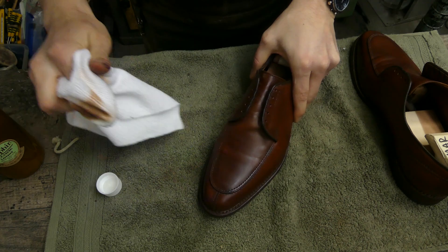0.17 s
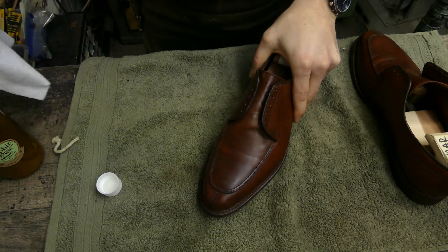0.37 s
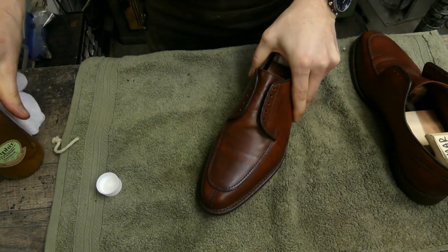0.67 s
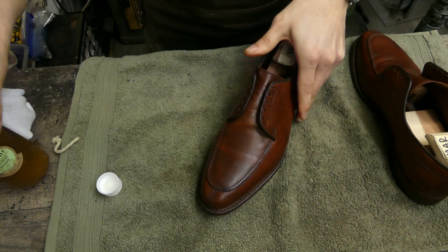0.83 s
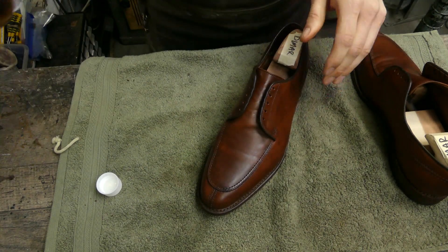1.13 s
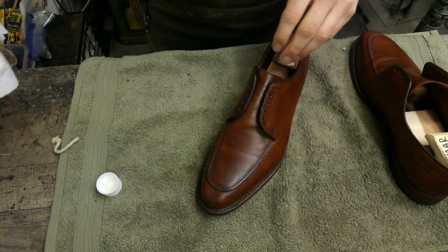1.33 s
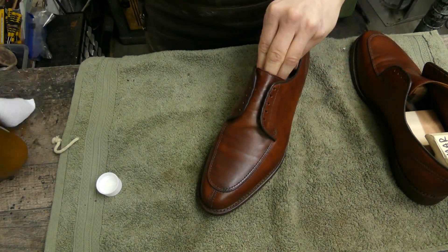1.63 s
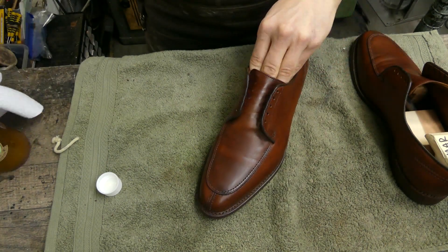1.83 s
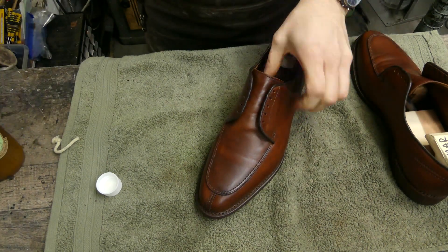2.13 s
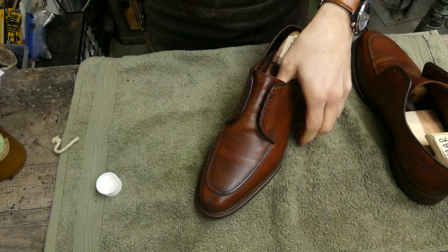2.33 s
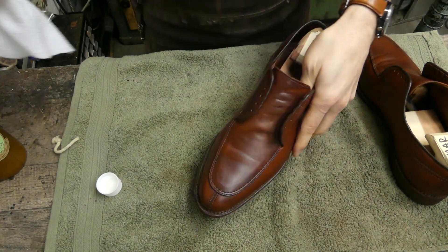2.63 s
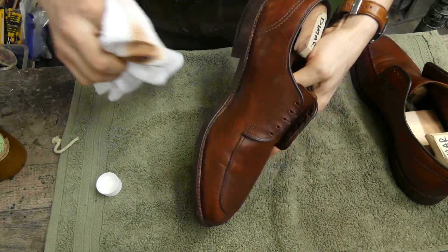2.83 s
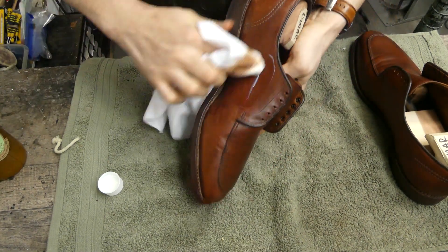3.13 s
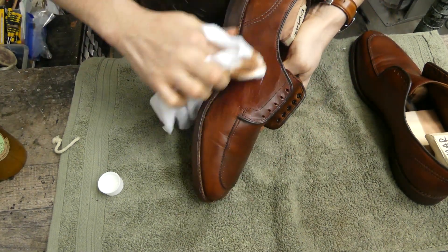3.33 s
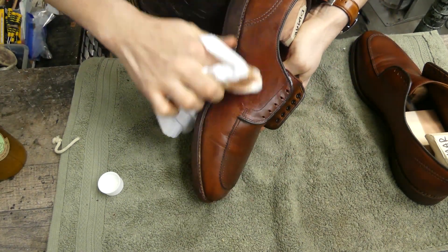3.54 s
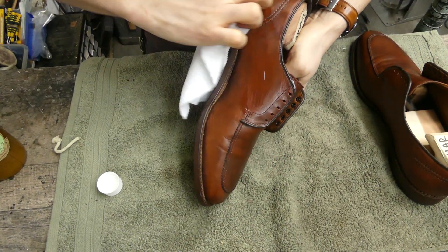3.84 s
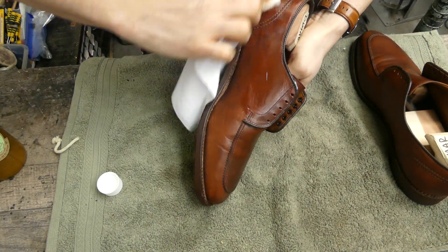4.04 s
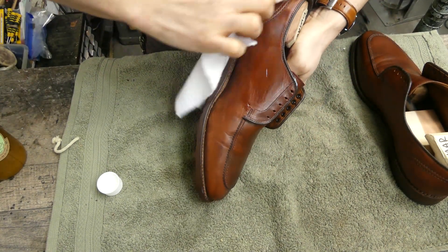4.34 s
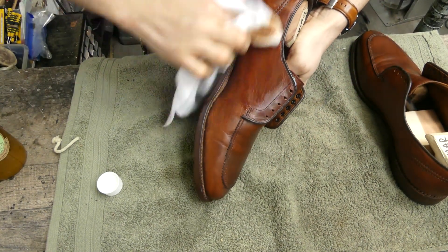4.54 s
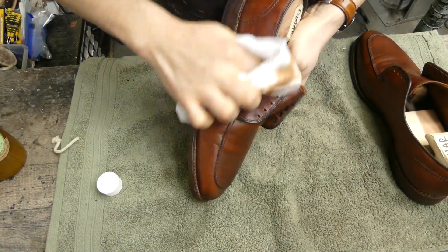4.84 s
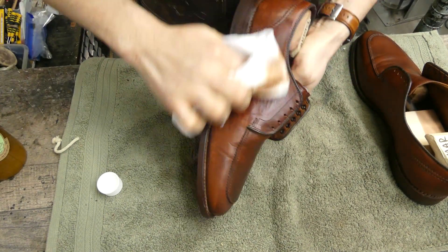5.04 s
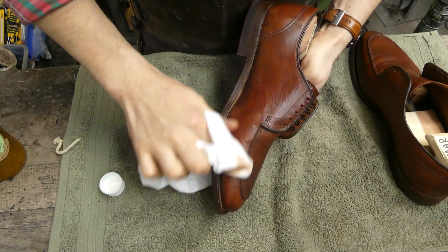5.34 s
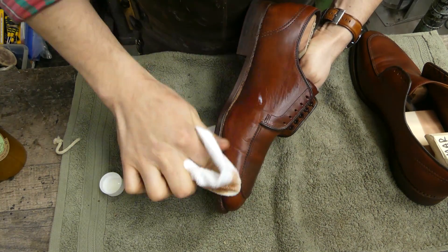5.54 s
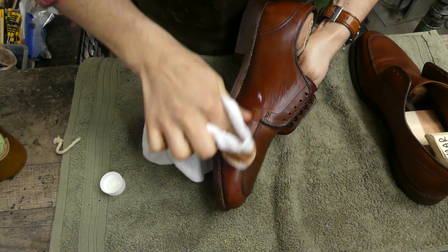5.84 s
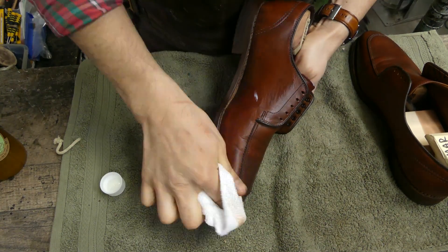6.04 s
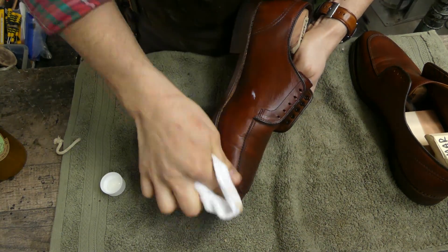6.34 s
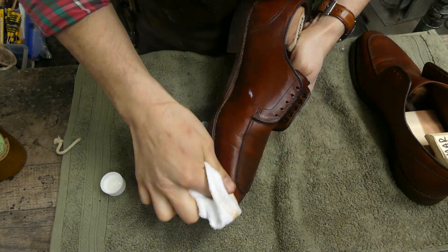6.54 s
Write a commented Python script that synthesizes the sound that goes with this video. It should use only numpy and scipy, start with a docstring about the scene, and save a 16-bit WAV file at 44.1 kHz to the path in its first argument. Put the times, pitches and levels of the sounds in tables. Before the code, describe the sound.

In a quiet workshop, a shoe is set down with booming wooden thuds, then brisk scratchy cloth rubbing with little clicks and squeaks.

```python
"""Cloth rustle, room tone, low wobble and small taps open; a shoe is cleaned in a quiet workshop.
Bottle and shoe are handled on a towel-covered wooden bench, then cloth strokes rub the leather:
shaped noise follows stroke speed, catches ring the leather, squeals are narrow sagging noise.
Blows ring damped bench modes and overload the recorder; its stand sways near 30 Hz.
Short ringing sines make taps and buckle jingles; feedback delays make the room."""
import sys
import numpy as np
from scipy import signal
from scipy.io import wavfile

SR = 44100
rng = np.random.default_rng(int(sys.argv[2]) if len(sys.argv) > 2 else 0)


def master_out(mix):
    """Clip the mix to full scale and print it as 16-bit PCM to the path in sys.argv[1]."""
    frames = np.transpose(np.atleast_2d(mix))
    ceiling = np.clip(frames, -1, 1)
    pcm = np.round(ceiling * 32767).astype(np.int16)
    wavfile.write(sys.argv[1], SR, pcm)


N = 295029


def amp(db):
    """Decibels to linear amplitude."""
    return 10 ** (np.asarray(db) / 20)


def rms_one(x):
    """Scale to rms 1."""
    return x / np.sqrt(np.mean(x ** 2) + 1e-20)


def at_hz(points, hz):
    """Interpolate a table over log frequency."""
    table_hz, values = np.array(points).T
    return np.interp(np.log(hz), np.log(table_hz), values)


def drift(rate_hz):
    """Slow random signal of spread 1: noise through a double one-pole low-pass, at SR / 40."""
    r = np.exp(-80 * np.pi * rate_hz / SR)
    noise = rng.standard_normal(N // 40 + 2002)
    slow = signal.lfilter([1], [1, -2 * r, r * r], noise)[2000:]
    return np.interp(np.arange(N) / 40, np.arange(len(slow)), rms_one(slow))


def soften(x, hz):
    """Padded contact: double one-pole low-pass."""
    r = np.exp(-2 * np.pi * hz / SR)
    return signal.lfilter([(1 - r) ** 2], [1, -2 * r, r * r], x)


def ring(clicks, hz, t60_s):
    """Two-pole resonator: a unit click starts a decaying sine of height 1."""
    r, w = amp(-60 / (t60_s * SR)), 2 * np.pi * hz / SR
    return signal.lfilter([0, np.sin(w)], [1, -2 * r * np.cos(w), r * r], clicks + 1e-18)


def grit(per_s, spread_db):
    """Dense fibre slips: random clicks of uneven size on fine noise, two unrelated draws."""
    size_db = spread_db * np.minimum(rng.exponential(1, (2, N)), 4)
    clicks = amp(size_db) * (rng.random((2, N)) < per_s / SR)
    return rms_one(rng.standard_normal((2, N)) * (1 + clicks))


def stereo(pair, alike):
    """Left and right share the first draw and differ by the second."""
    alike = np.clip(alike, 0, 1)
    return np.sqrt(1 + alike) * pair[0] + np.sqrt(1 - alike) * pair[1] * [[1], [-1]]


def banded(sources, spectrum, likeness, patchy_db, low_hz):
    """Half-octave noise bands, each with its level, flicker and likeness; rms 1."""
    out, edges_hz = 0, low_hz * 2 ** np.arange(0, np.log2(18000 / low_hz), 0.5)
    for k, (low, high) in enumerate(zip(edges_hz, edges_hz[1:])):
        band = signal.butter(2, [low, high], "band", fs=SR, output="sos")
        pair = signal.sosfilt(band, sources[k % 2])
        hz = np.sqrt(low * high)
        level = amp(at_hz(spectrum, hz) + patchy_db * drift(14.5))
        out = out + level * stereo(pair, at_hz(likeness, hz))
    return rms_one(out)


def resonant(pair, peaks, likeness, patchy_db):
    """Parallel resonances with alternating sign, each swelling on its own; rms 1."""
    out = 0
    for k, (hz, width_hz, level_db) in enumerate(peaks):
        r = np.exp(-np.pi * width_hz / SR)
        poles = [1, -2 * r * np.cos(2 * np.pi * hz / SR), r * r]
        band = signal.lfilter([1 - r * r, 0, r * r - 1], poles, pair)
        level = (-1) ** k * amp(level_db + patchy_db * drift(17.0))
        out = out + level * stereo(band, at_hz(likeness, hz))
    return rms_one(out)


# room tone and microphone hiss: (frequency [Hz], relative level [dB])
AIR_SPECTRUM = [(26, -42), (45, 17), (85, -31), (191, -33), (233, 9.5), (263, -19.5), (336, 4.5),
                (371, -19), (409, 0), (486, -32.5), (719, -3.5), (942, -20), (4640, -23.5), (12700, -20),
                (15800, -13.5)]
# left-right likeness of the air: (frequency [Hz], likeness [0-1])
AIR_LIKENESS = [(60, 0.85), (180, 0.97), (550, 0.61), (1650, 0.14), (4970, 0.29), (15000, 0.88)]
AIR_DB = -46


def room_air():
    """Steady room tone and hiss: noise in flickering bands."""
    noise = rng.standard_normal((2, 2, N))
    return amp(AIR_DB) * banded(noise, AIR_SPECTRUM, AIR_LIKENESS, patchy_db=0.5, low_hz=45.65)


# cloth, bottle and shoe moved about:
# (time loudest [s], swell time [s], fibre hiss [dB], drag [dB], hollow [dB])
RUSTLES = [(0.0, .01, -38, -45.5, -39), (0.671, 0.22, -64, -42.5, -45.5), (0.793, .03, -36.5, -38, -34.5),
           (0.86, 0.034, -75, -55, -56), (1.19, 0.33, -61, -61, -53.5), (1.66, 0.15, -49, -60, -48.5),
           (1.778, 0.029, -43, -43.5, -39.5), (1.86, 0.11, -61, -50, -52), (1.998, 0.033, -53, -49, -40.5),
           (2.1, 0.13, -50, -55, -48.5), (2.36, 0.36, -59, -51.5, -71), (2.6, 0.25, -58, -49.5, -49.5),
           (2.76, 0.24, -51, -61, -50), (2.93, 0.16, -48.5, -59, -50)]
SWELL_DB, RUSTLE_FADE_DB_S = 17.5, 130.5   # rise over one swell time; fade rate


def rustle_levels():
    """Hiss, drag and hollow levels of the handling: exponential swell and fade."""
    t, levels = np.arange(N) / SR, np.zeros((3, N))
    for s, swell_s, *level_db in RUSTLES:
        shape_db = np.where(t < s, SWELL_DB * (t - s) / swell_s, RUSTLE_FADE_DB_S * (s - t))
        levels += np.outer(amp(level_db), amp(shape_db))
    return levels


# fibre hiss: (frequency [Hz], relative level [dB per Hz])
FIBRES = [(2100, -3), (2700, 0.5), (3500, -2), (4800, 0.5), (5800, 0.5), (6900, 3.5), (8500, 2),
          (10500, -5), (13000, -7), (16000, -7)]
# leather panels: (frequency [Hz], width [Hz], relative level [dB])
LEATHER_PANELS = [(1566, 1800, 11), (2020, 590, 14.5), (2460, 1060, -4)]
# air and shell of the shoe: (frequency [Hz], width [Hz], relative level [dB])
SHOE_HOLLOW = [(344, 103, 6.5), (730, 168, 1), (987, 34, 4), (1235, 79, 1)]
# left-right likeness of the rubbing: (frequency [Hz], likeness [0-1])
RUB_LIKENESS = [(60, 0.97), (180, 0.94), (550, 0.93), (1650, 0.6), (4970, 0.87), (15000, 0.15)]
GRIP_DB, GRIP_HZ = 1.6, 21.5   # spread and rate of the wavering grip


def friction():
    """Fibre slips hiss, drag on the panels and excite the hollow; grip wavers per layer."""
    levels = rustle_levels() + stroke_levels()
    levels *= amp([GRIP_DB * drift(GRIP_HZ) for layer in levels])
    hiss_grit = [grit(1500, 3.0), grit(1500, 3.0)]
    hiss = banded(hiss_grit, FIBRES, RUB_LIKENESS, patchy_db=0.8, low_hz=2100)
    drag = resonant(grit(600, 4.0), LEATHER_PANELS, RUB_LIKENESS, patchy_db=1.5)
    hollow = resonant(grit(300, 5.0), SHOE_HOLLOW, RUB_LIKENESS, patchy_db=1.5)
    return levels[0] * hiss + levels[1] * drag + levels[2] * hollow


# jolts reaching the recorder stand through the bench:
# (time of widest swing [s], swing [dB], rumble [dB])
JOLTS = [(0.0, -23, -37), (0.12, -32, -60), (0.54, -26, -34.5), (0.74, -26, -41), (0.838, -10, -34),
         (1.0, -32.5, -50), (1.58, -37.5, -66), (1.816, -13.5, -20), (1.91, -23, -48), (2.08, -33, -36.5),
         (2.33, -31, -35.5), (2.42, -42, -40), (3.113, -3.5, -7), (3.3, -27, -57), (3.45, -41, -44.5),
         (3.57, -31, -55), (3.69, -24, -49), (3.88, -33.5, -47), (4.05, -36, -53), (4.22, -32.5, -47),
         (4.471, -26.5, -54), (4.63, -24, -47), (4.73, -28, -41.5), (4.922, -24.5, -26.5), (5.209, -6, -11),
         (5.38, -31.5, -37), (5.47, -29.5, -41), (5.57, -22, -32.5), (5.678, -21.5, -32),
         (5.79, -23.5, -41.5), (5.91, -18.5, -41), (6.02, -24.5, -40), (6.148, -18.5, -36),
         (6.289, -18, -38), (6.41, -30, -36.5), (6.548, -18.5, -31.5), (6.672, -15, -28.5)]
AFTER_FADE_DB_S = 81   # slow fade, swing and rumble


def jolt_levels(column, lead_s, build_s, fade_db_s, after_db):
    """Each jolt builds up, fades quickly, then slowly; powers add."""
    t, power = np.arange(0, N + 40, 40) / SR, 0
    for row in JOLTS:
        since_s = t - row[0] + lead_s
        after_s = np.maximum(since_s, 0)
        build = np.sin(np.pi / 2 * np.clip(1 + since_s / build_s, 0, 1)) ** 2
        fade = amp(-fade_db_s * after_s) + amp(after_db - AFTER_FADE_DB_S * after_s)
        power = power + (amp(row[column]) * build * fade) ** 2
    return np.interp(np.arange(N) / SR, t, np.sqrt(power))


SWING_HZ, SWING_REST_DB, RUMBLE_REST_DB = 30.87, -54, -58.5


def wobble():
    """Stand swings at one low, unsteady pitch and passes on a dull rumble."""
    sway = jolt_levels(column=1, lead_s=0, build_s=0.042, fade_db_s=216, after_db=-20)
    shake = jolt_levels(column=2, lead_s=0.012, build_s=0.03, fade_db_s=280, after_db=-24)
    phase = 2 * np.pi * np.cumsum(SWING_HZ * (1 + 0.1222 * drift(7.6))) / SR
    swing_level = (sway + amp(SWING_REST_DB)) * amp(2.2 * drift(12))
    swing = np.sqrt(2) * swing_level * np.sin(phase)
    band = signal.butter(2, [55, 108], "band", fs=SR, output="sos")
    noise = signal.sosfilt(band, rng.standard_normal((2, N)))
    rumble = (shake + amp(RUMBLE_REST_DB)) * rms_one(stereo(noise, 0.73))
    return swing * amp([[0.3], [-0.3]]) + rumble


# fingers, shoe tree and bottle:
# (time [s], level [dB], ring [Hz], snap level [dB], snap frequency [Hz])
TAPS = [(0.039, -29.5, 1680, -36, 2630), (0.06, -27, 970, -34.5, 2410), (0.181, -35, 453, -41.5, 8150),
        (0.373, -36, 790, -36, 4440), (0.879, -30, 1180, -26, 3270), (1.137, -41, 1340, -40, 5410),
        (1.159, -36.5, 496, -44, 3090), (1.183, -40, 850, -40, 5680), (1.992, -23.5, 745, -29.5, 4100),
        (2.098, -30, 690, -34, 4550), (2.678, -25, 915, -33, 2380), (2.874, -26, 730, -56, 3050),
        (3.032, -30.5, 740, -50, 6500), (3.811, -30, 600, -48, 3380), (3.838, -14, 715, -30, 2000),
        (3.844, -16, 565, -49, 4150), (4.116, -9.5, 613, -33, 2020), (4.164, -21, 1260, -38, 2040),
        (4.766, -29, 960, -41, 2500), (4.899, -15, 986, -30, 7070), (5.295, -28, 600, -34, 2540),
        (5.751, -40, 724, -36.5, 2610), (5.927, -30.5, 980, -26.5, 5200), (5.991, -45, 900, -36, 2600),
        (6.508, -34, 736, -33, 2830), (6.572, -31.5, 860, -43, 2460), (6.646, -19, 660, -34.5, 2930)]
TAP_T60_S, SNAP_T60_S, TAP_ONSET_S = 0.023, 0.019, 0.0011


def taps():
    """Each tap rings briefly with one faster-fading overtone, plus a noise snap."""
    out, t = np.zeros(N), np.arange(SR // 8) / SR
    noises = rng.standard_normal((len(TAPS), len(t)))
    for (s, level_db, hz, snap_db, snap_hz), noise in zip(TAPS, noises):
        overtone = 0.51 * np.sin(2 * np.pi * 1.675 * hz * t) * amp(-60 * t / TAP_T60_S)
        tone = np.sin(2 * np.pi * hz * t) + overtone
        tone *= amp(level_db - 60 * t / TAP_T60_S) * np.minimum(t / TAP_ONSET_S, 1)
        band = signal.butter(1, [snap_hz / 1.94, snap_hz * 1.36], "band", fs=SR, output="sos")
        snap = rms_one(signal.sosfilt(band, noise)) * amp(snap_db - 60 * t / SNAP_T60_S)
        i = round(s * SR)
        out[i:i + len(t)] += (tone + snap)[:N - i]
    return out


# watch buckle touches: (time [s], level [dB])
JINGLES = [(0.0692, -34), (6.118, -30.5), (6.377, -30), (6.6192, -32)]
# buckle modes: (frequency [Hz], relative level [dB], t60 [s])
BUCKLE_MODES = [(6960, -6.5, 0.024), (7960, 0, 0.027)]


def jingles():
    """Double touch, the second stronger, rings the buckle modes."""
    touches = np.zeros(N)
    for s, level_db in JINGLES:
        pair = [round(s * SR), round((s + 0.0022) * SR)]
        touches[pair] = amp(level_db) * np.array([0.6, 1])
    return sum(amp(mode_db) * ring(touches, hz, t60_s) for hz, mode_db, t60_s in BUCKLE_MODES)


def crack(rows, t60_s, low_hz, high_hz):
    """Short decaying band-noise burst at each contact."""
    kicks = np.zeros(N)
    for s, level_db in rows:
        kicks[round(s * SR)] = amp(level_db)
    fade = signal.lfilter([1], [1, -amp(-60 / (t60_s * SR))], kicks + 1e-18)
    band = signal.butter(1, [low_hz, high_hz], "band", fs=SR, output="sos")
    return fade * rms_one(signal.sosfilt(band, rng.standard_normal(N)))


# blows on the bench: (time [s], level [dB], hardness: modes over 400 Hz [dB],
# crack level [dB], damping: share of free ring time [0-1])
BLOWS = [(0.513, -27.5, -15, -60, 0.66), (0.535, -29, -30, -67, 0.63), (0.7, -18, -33, -42, 1),
         (0.795, -9, -15, -24, 0.66), (1.776, 3, -1, -22.5, 0.43), (2.059, -28.5, 1, -44, 0.6),
         (2.293, -25.5, -9, -47.5, 0.24), (2.305, -23.5, -14, -51, 0.58), (3.079, 6.5, -16, -17.5, 0.83),
         (3.087, -7.5, -0.5, -21.5, 0.79), (5.177, -4.5, -21, -31.5, 0.82), (5.195, -13, -5, -35, 0.27)]
# bench modes: (frequency [Hz], relative level [dB], free t60 [s])
BENCH_MODES = [(155.9, -8.5, 0.24), (198.8, 3, 0.16), (278, -1, 0.1), (328.8, -9, 0.171),
               (436, -20.5, 0.32), (509, -10, 0.11), (619.6, -8.5, 0.16), (762, -21, 0.25),
               (930, -24, 0.36), (993, -16.5, 0.15), (1128, -10, 0.059), (1326, -9.5, 0.12),
               (1330, -49, 0.15)]
CONTACT_HZ, SINK_S, CRACK_DELAY_S = 1460, 0.0054, 0.002


def blows():
    """Blows ring the bench modes; hard ones reach the upper modes, a resting hand damps them."""
    out, t = np.zeros((2, N)), np.arange(SR // 2) / SR
    spread_db = rng.normal(0, 1.5, (len(BLOWS), len(BENCH_MODES)))
    hz, mode_db, t60_s = np.transpose(BENCH_MODES)[:, :, None]
    upper = hz > 400
    sinking = np.minimum(t / SINK_S, 1)   # towel gives way before the wood is met
    for (s, level_db, hard_db, crack_db, damping), own_db in zip(BLOWS, spread_db):
        start_db = level_db + mode_db + hard_db * upper + own_db[:, None]
        level = amp(start_db - 60 * t / (t60_s * damping))
        rings = sinking * level * np.sin(2 * np.pi * hz * t)
        for side, lean_db in enumerate([2.0, -2.0]):   # upper modes: through the air, from the left
            mixed = np.sum(rings * amp(lean_db * upper), axis=0)
            out[side, round(s * SR):][:len(t)] += mixed
    contacts = np.array(BLOWS)[:, [0, 3]] + [CRACK_DELAY_S, 0]
    burst = crack(contacts, t60_s=0.086, low_hz=640, high_hz=1480)
    return soften(out, CONTACT_HZ) + burst * amp([[2.0], [-2.0]])


# cloth catching on seams and creases: (time [s], length [s], ring [Hz], level [dB])
CATCHES = [(1.682, 0.044, 724, -48.5), (2.878, 0.04, 680, -39.5), (3.467, 0.05, 960, -36.5),
           (3.653, 0.028, 1140, -38.5), (3.8, 0.018, 664, -39), (3.867, 0.063, 630, -38),
           (3.979, 0.033, 796, -40.5), (4.064, 0.016, 685, -42), (4.151, 0.028, 1150, -29.5),
           (4.221, 0.085, 1170, -43.5), (4.349, 0.03, 1200, -37), (4.441, 0.031, 1220, -34),
           (4.483, 0.014, 960, -35.5), (4.6, 0.026, 900, -37), (4.654, 0.0304, 980, -35),
           (4.859, 0.059, 940, -36), (4.882, 0.032, 980, -34.5), (5.13, 0.038, 970, -39),
           (5.31, 0.029, 1250, -41), (6.047, 0.019, 1520, -44), (6.316, 0.042, 1180, -47.5)]
CATCH_CYCLES = 8.4   # t60 in cycles of the lower ring


def catches():
    """Bursts of uneven slips ring the leather for a few cycles, faintly also at 1.85 times the pitch."""
    slips = np.diff(grit(610, 2.5), prepend=0)
    t, out = np.arange(N) / SR, np.zeros((2, N))
    for s, length_s, hz, level_db in CATCHES:
        part = slice(round(s * SR), round((s + length_s + 0.036) * SR))
        times_s = [0, 0.003, length_s, length_s + 0.00094]
        swell = np.interp(t[part] - s, times_s, [0.073, 0.92, 0.54, 0.072])
        t60_s = CATCH_CYCLES / hz
        low = rms_one(ring(slips[:, part], hz, t60_s))
        high = rms_one(ring(slips[:, part], 1.85 * hz, t60_s))
        out[:, part] += amp(level_db) * swell * stereo(low + 0.096 * high, 0.94)
    return out


# cloth strokes, each until the next turn:
# (time of turn [s], speed-up time [s], fibre hiss [dB], drag [dB])
STROKES = [(2.993, 0.12, -41.5, -46), (3.142, 0.058, -38, -39.5), (3.236, 0.036, -38, -42.5),
           (3.342, 0.071, -38, -45), (3.458, .029, -38, -43.5), (3.56, 0.074, -36.5, -50),
           (3.699, .034, -41, -45), (3.766, 0.046, -39.5, -46), (3.932, 0.06, -41.5, -40),
           (4.033, 0.053, -41, -48), (4.12, 0.046, -40.5, -40), (4.202, 0.05, -39.5, -37),
           (4.301, 0.032, -39, -46.5), (4.41, 0.067, -35, -36), (4.529, 0.051, -35.5, -47),
           (4.631, 0.044, -34, -40), (4.748, 0.063, -36.5, -43), (4.854, .057, -38, -39.5),
           (4.964, 0.036, -42, -46), (5.078, 0.053, -37, -53), (5.194, 0.049, -39, -40),
           (5.29, .045, -38.5, -42), (5.385, 0.055, -38.5, -39.5), (5.495, 0.056, -38, -38.5),
           (5.621, 0.042, -39, -44), (5.744, 0.063, -41, -41.5), (5.859, 0.064, -39.5, -47.5),
           (5.973, 0.079, -40.5, -43.5), (6.102, 0.061, -42.5, -48), (6.243, 0.076, -41.5, -43),
           (6.357, 0.091, -41.5, -48), (6.499, 0.065, -43.5, -46.5), (6.597, 0.11, -38.5, -45)]
LAST_TURN_S, LEAD_S, RUN_ON_S, SPEED_POWER = 6.76, 0.0042, 0.011, 1.005
HOLLOW_DB, HOLLOW_FOLLOWS_DRAG = -3.5, 0.34   # hollow level lies between hiss and drag, plus offset
CIRCLING_SPEED, CIRCLES_UNTIL_S = 0.13, 3.65   # early circling: share of top speed kept at a turn


def stroke_levels():
    """Hiss, drag and hollow levels follow cloth speed: swell, then fade towards the turn."""
    t, levels = np.arange(N) / SR, np.zeros((3, N))
    ends_s = [row[0] for row in STROKES[1:]] + [LAST_TURN_S]
    for (start, rise_s, hiss_db, drag_db), end in zip(STROKES, ends_s):
        rest = CIRCLING_SPEED * (end < CIRCLES_UNTIL_S)
        times_s = [start - LEAD_S, start + rise_s, end + RUN_ON_S]
        speed = np.interp(t, times_s, [rest, 1, rest], left=0, right=0)
        hollow_db = HOLLOW_DB + hiss_db + HOLLOW_FOLLOWS_DRAG * (drag_db - hiss_db)
        loudness = np.sin(np.pi / 2 * speed) ** SPEED_POWER
        levels += np.outer(amp([hiss_db, drag_db, hollow_db]), loudness)
    return levels


# damp cloth on the polish:
# (time loudest [s], swell time [s], fade time [s], pitch when loudest [Hz], level [dB])
SQUEALS = [(3.122, .015, 0.1, 2830, -38), (3.423, 0.022, 0.094, 2680, -44.5), (4.81, 0.027, 0.1, 2600, -44),
           (5.272, 0.081, 0.027, 2860, -43)]
SQUEAL_WIDTH_HZ, SQUEAL_SAG_HZ_S, SQUEAL_RANGE_DB = 230, 1200, 18


def squeals():
    """Narrow-band noise sagging in pitch: soft complex noise on a falling carrier."""
    t, out = np.arange(N) / SR, np.zeros(N)
    noise = rng.standard_normal(N) + 1j * rng.standard_normal(N)
    wander = rms_one(soften(noise, SQUEAL_WIDTH_HZ).view(float)).view(complex)
    for s, swell_s, fade_s, hz, level_db in SQUEALS:
        shape = np.interp(t, [s - swell_s, s, s + fade_s], [0, 1, 0])
        phase = 2 * np.pi * (hz * (t - s) - SQUEAL_SAG_HZ_S * (t - s) ** 2 / 2)
        level = (shape > 0) * amp(level_db - SQUEAL_RANGE_DB * (1 - shape))
        out += level * np.real(wander * np.exp(1j * phase))
    return out


SHOP_T60_S, WALL_CUT_HZ, SHOP_DB = 0.24, 3000, -11


def shop(x):
    """Workshop echo: six feedback delays a side, duller on every round."""
    out, dull = np.zeros((2, N)), np.exp(-2 * np.pi * WALL_CUT_HZ / SR)
    lags = (rng.uniform(0.01, 0.035, 12) * SR).astype(int)
    for k, lag in enumerate(lags):
        loop, gain, state = x.copy(), amp(-60 * lag / SR / SHOP_T60_S), [0.]
        for i in range(lag, N, lag):
            back, state = signal.lfilter([gain * (1 - dull)], [1, -dull], loop[i - lag:i], zi=state)
            loop[i:i + lag] += back[:N - i]
        out[k % 2] += (loop - x) * (-1) ** (k // 2)
    return out


def scene():
    """Work lies slightly left; its sound above 300 Hz, without the rubbing, feeds the room."""
    bench, small = blows(), taps() + jingles() + squeals()
    rubbing = friction() + catches()
    highpass = signal.butter(2, 300, "high", fs=SR, output="sos")   # lows travel through the wood
    airborne = signal.sosfilt(highpass, bench.mean(axis=0) + small)
    near = small * amp([[1.5], [-1.5]]) + rubbing * amp([[1.3], [-1.3]])
    near = near + bench * amp([[0.4], [-0.4]])
    return near + amp(SHOP_DB) * shop(airborne) + room_air() * amp([[0.4], [-0.4]]) + wobble()


NOTCH_HZ, NOTCH_WIDTH_HZ, CUTOFF_HZ = 5940, 120, 16150


def record(dry):
    """Narrow dip near 6 kHz, overload with a short knee near full scale, steep top cut."""
    dipped = signal.lfilter(*signal.iirnotch(NOTCH_HZ, NOTCH_HZ / NOTCH_WIDTH_HZ, SR), dry)
    squeezed = 1.04 * dipped / (1 + dipped ** 6) ** (1 / 6)
    top_cut = signal.cheby2(20, 70, CUTOFF_HZ, fs=SR, output="sos")
    return np.clip(signal.sosfilt(top_cut, squeezed), -1, 1)


dry = scene()
out = record(dry)
master_out(out)
```